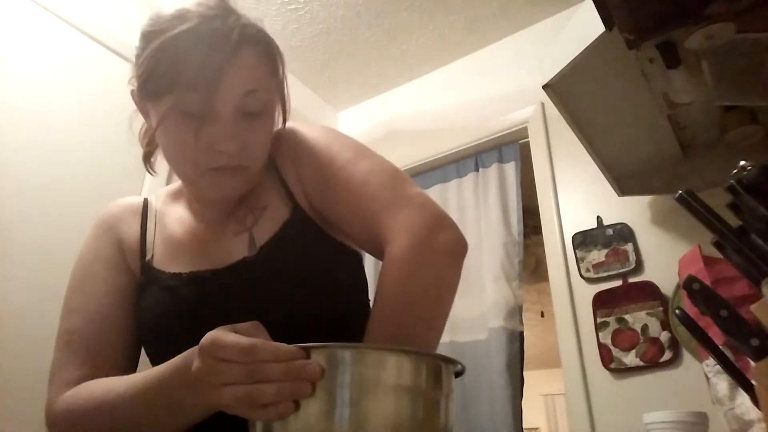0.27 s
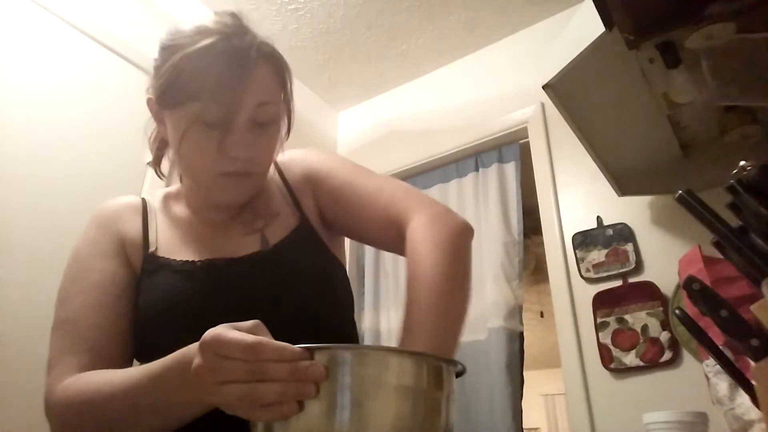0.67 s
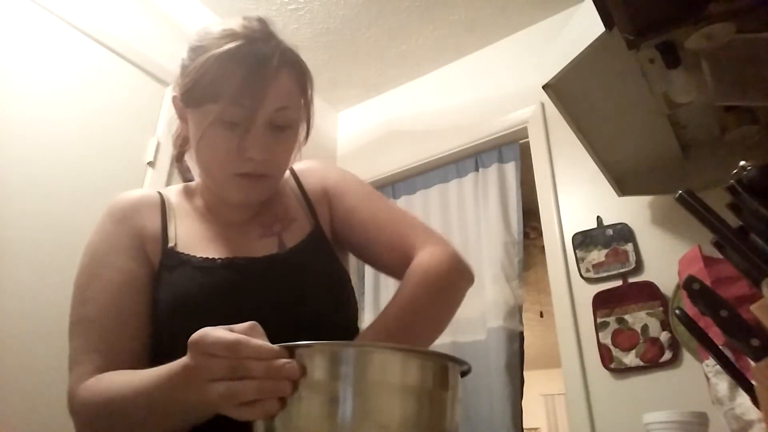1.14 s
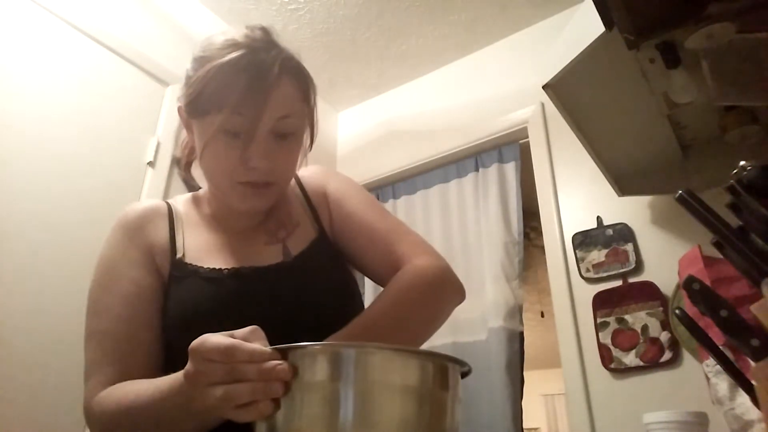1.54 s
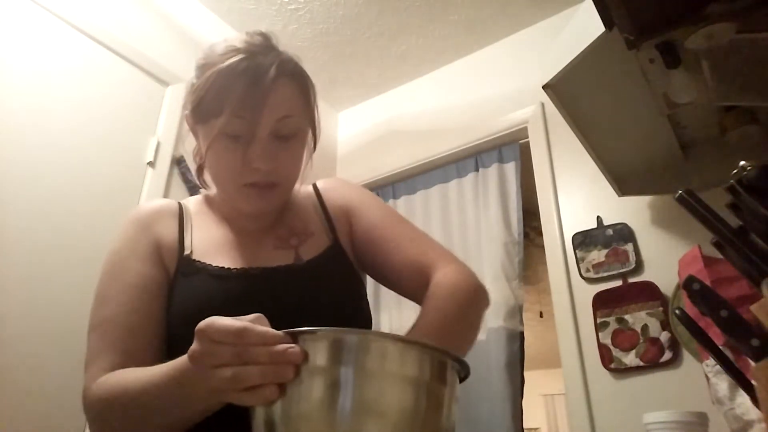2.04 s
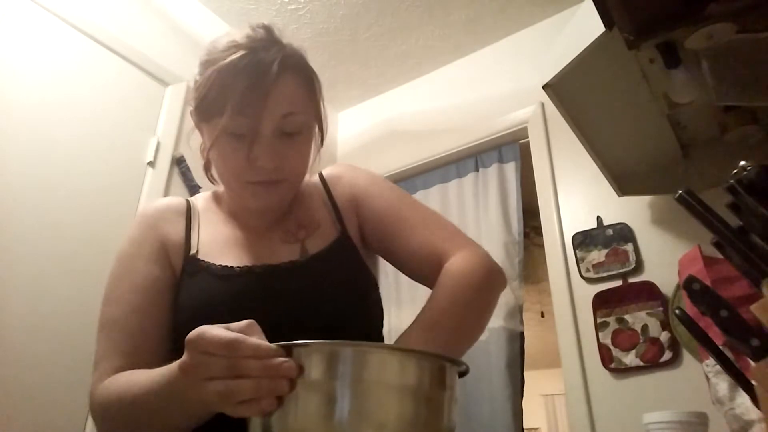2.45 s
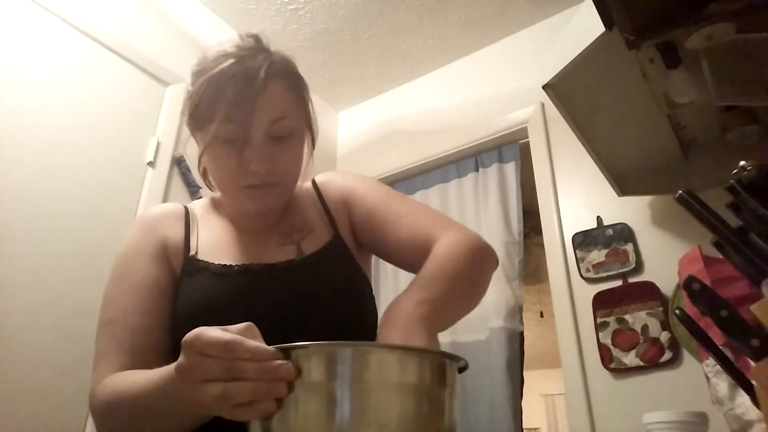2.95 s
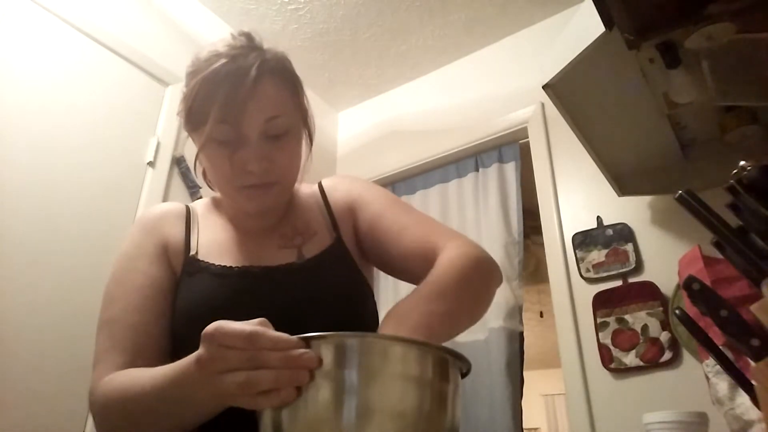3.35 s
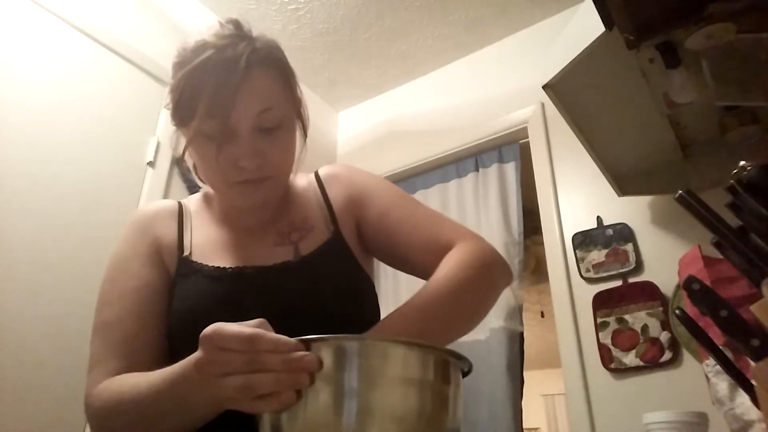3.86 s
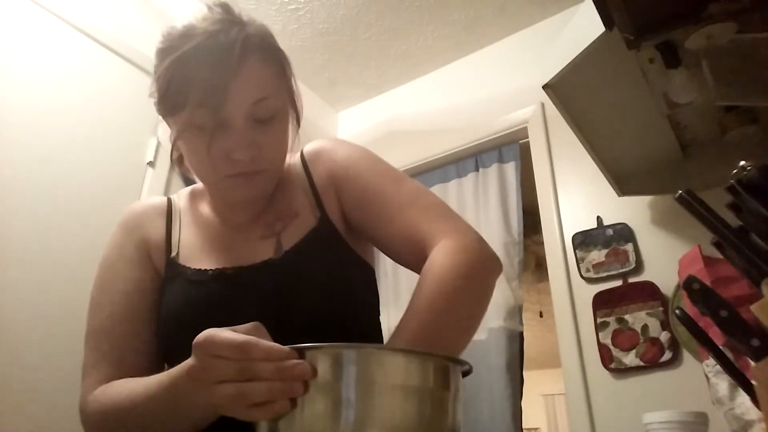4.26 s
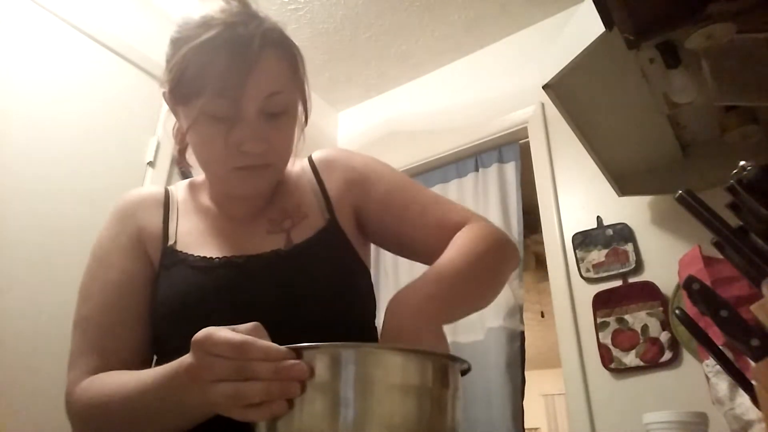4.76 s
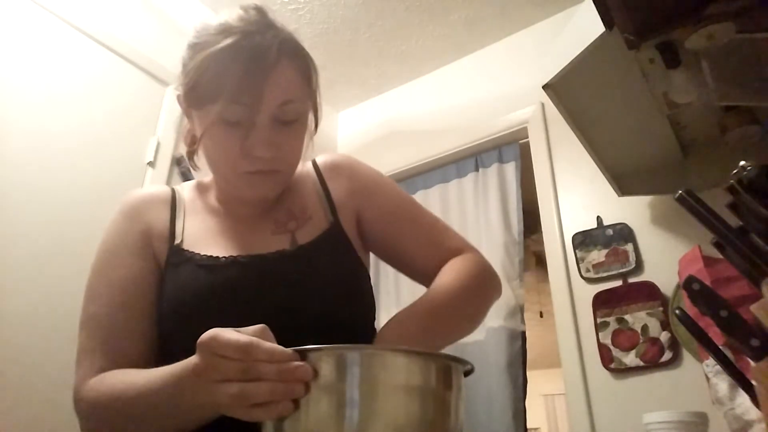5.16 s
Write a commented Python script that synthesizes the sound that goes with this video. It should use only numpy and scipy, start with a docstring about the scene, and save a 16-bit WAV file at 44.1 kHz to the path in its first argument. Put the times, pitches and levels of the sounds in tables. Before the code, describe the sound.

Close kneading in a metal bowl: sharp knock, dull push, bright double clang, then quiet rubbing and a few later thumps.

```python
"""A small, quiet kitchen: hands knead dough in a steel bowl on the counter, close to the microphone.
Pushes excite the counter's low modes; the bowl's base knocks, and once its bare wall clangs and rebounds.
Rubbing, wet squelches and hissing wipes are shaped noise; taps and slips make the rim ring faintly.
Faint air noise and an appliance's hum lie beneath; a noise suppressor hushes the pauses."""
import sys
import numpy as np
from scipy import signal
from scipy.fft import rfft, irfft
from scipy.io import wavfile
from scipy.ndimage import uniform_filter1d, minimum_filter1d

SR = 44100
rng = np.random.default_rng(int(sys.argv[2]) if len(sys.argv) > 2 else 0)


def unload_wav(signal):
    """Save mono or channel-first audio to the path in sys.argv[1] as 16-bit WAV at rate SR, clipped to [-1, 1]."""
    wavfile.write(
        sys.argv[1],
        SR,
        np.round(np.clip(np.atleast_2d(signal).T, -1, 1) * 32767).astype(np.int16),
    )


N = 238592
RING = np.arange(28000) / SR  # time axis of a single sound, s


def thud(db, corner_hz, damping_t60):
    """Modal excitation: a push through soft dough sets the counter booming; the hand's weight damps it."""
    # modes of the counter: f/Hz, relative level/dB, t60/s before the hand's damping
    counter = [(76.5, -6, 0.29), (93.9, 3.5, 0.096), (116.3, -3.5, 0.31), (177.4, -2.5, 0.19),
               (211, 0, 0.14), (240.7, 1.5, .045), (331, -5, 0.14)]
    onset = 1 - np.exp(-RING / 0.002)
    boom = soften(ring(counter, spread_hz=900) * onset, corner_hz, fall_db=23.0)
    boom = boom * 1000 ** (-RING / damping_t60)
    boom = highpass(boom, 66, order=6)
    return amp(db) * unit_blow(in_room(boom, wet_db=-12.0))


def knock(db, corner_hz, fall_db):
    """Impact: the base cracks down and rings briefly; a near wall and the room return duller clatter."""
    # dense clatter of bowl and counter: f/Hz, relative spectral level/dB
    clatter_spectrum = [(60, -30), (170, -9), (300, -2), (450, -1.5), (600, 1.5), (830, 0), (1050, -9.5),
                        (2100, -12.5), (2900, -18), (5500, -20), (8000, -31), (10500, -32), (16000, -27.5)]
    # modes of the bowl's base, damped by the dough: f/Hz, level/dB (each row gains 0.75 dB on the last), t60/s
    base_modes = [(207, -6.5, 0.078), (337, 4, 0.04), (401.7, -11, .15), (514, 0.5, 0.085),
                  (597, -4.5, 0.35), (687, -7, 0.34), (834, 2.5, 0.052), (1313, -7.5, 0.069),
                  (1900, -14, 0.034), (2094, -12, 0.078)]
    crack = contact(chatter_s=0.0035, chatter_db=5.5)
    near_wall = np.roll(crack, round(0.015 * SR), axis=1)
    echoes = amp(-8) * near_wall + amp(-2.0) * tail(build_s=0.0017)
    dull_echoes = soften(echoes, corner_hz=2420, fall_db=5.0)
    clatter = colour(amp(-0.5) * crack + dull_echoes, lambda hz: read(clatter_spectrum, hz))
    # alternating signs; the factor 1.09 gives the extra gain from row to row
    base = highpass(ring(base_modes, spread_hz=4600, polarity=-1.09), 220)
    blow = unit_blow(clatter) + amp(-3.0) * base
    return amp(db) * unit_blow(soften(blow, corner_hz, fall_db))


def clang(db):
    """Shell vibration: thin steel chatters against the counter and rings, damped by the hand on the rim."""
    # modes of the steel wall: f/Hz, relative level/dB, t60/s
    wall_modes = [(301, -17, .3), (495, -21, .4), (571, -16, .38), (684, -10, .24), (858, -7, .25),
                  (895, 5, .11), (1138, -10, .15), (1352, -5, .13), (1610, -19, .28), (1668, -17, .33),
                  (1686, -19, .37), (1696, 0, .11), (1727, -10, .29), (2208, -16, .2), (2304, -13, .15),
                  (2620, -21, .14), (3283, -19, .19), (3320, -20, .17), (3556, -21, .12)]
    # dense clash of the wall's many other modes: f/Hz, relative spectral level/dB
    clash_spectrum = [(140, -18), (240, -11), (340, -0.5), (600, 3), (870, 6), (1020, -3), (1400, -.5),
                      (1690, 4.5), (1920, -8), (2250, -2), (2950, -25.5), (3330, -16.5), (3900, -24.5),
                      (5400, -39.5), (16000, -55.5)]
    impact = contact(chatter_s=0.013, chatter_db=14) + amp(-9) * tail(build_s=0.0015)
    clash = colour(impact, lambda hz: read(clash_spectrum, hz))
    wall = in_room(ring(wall_modes, spread_hz=800, polarity=-1), wet_db=-10)
    return amp(db) * unit_blow(unit_blow(clash) + amp(-3) * unit_blow(wall))


def squelch(db, rise_s, hz, octaves):
    """Band-limited bursts: a swell of tiny wet snaps, coloured by the air pocket that they open into."""
    swell = RING * np.exp(-RING / rise_s)
    snaps = diffuse(len(RING)) * rng.exponential(1, len(RING)) ** 2 * swell

    def pocket_db(f):
        # 3 dB down at the edges of a band so many octaves wide
        return -10 * np.log10(1 + (2 * np.log2((f + 1) / hz) / octaves) ** 4)

    wet = colour(snaps, pocket_db)
    return amp(db) * unit_blow(in_room(wet, wet_db=-7))


def wipe(length, db, tilt_db):
    """Sliding friction: skin on steel gives a fine hiss, brighter in some strokes than in others."""
    # colour of the hiss before the tilt: f/Hz, relative spectral level/dB
    hiss_colour = [(300, -11.5), (1600, -4), (2600, 0), (4500, -7), (6500, -3), (8300, -3.5), (10500, 0),
                   (13000, -4), (16000, 2)]
    pivot_hz = 6000  # the tilt, in dB per octave, leaves this frequency alone
    spectrum = [(hz, level + tilt_db * np.log2(hz / pivot_hz)) for hz, level in hiss_colour]
    hiss = diffuse(len(RING), spectrum) * grainy(len(RING), depth_db=0.5, size=300)
    return amp(db) * stroke(RING, length, rise_s=0.038, fade_s=0.04) * hiss


def tick(db, rise_s):
    """Stick-slip excitation: a fingertip grips and slips on the rim, whose modes ring faintly."""
    # modes of the rim: f/Hz, relative level/dB, t60/s
    rim = [(1718, -17.5, 0.025), (3305, -16.5, 0.019), (3358, 10, 0.054), (3468, 4.5, 0.039),
           (5292, -2, .03), (5310, -4, 0.035)]
    slips = rng.standard_normal(len(RING)) * RING * np.exp(-RING / rise_s)
    ping = signal.fftconvolve(ring(rim, spread_hz=1000), slips[None], axes=1)[:, :len(RING)]
    ping = highpass(ping, 1400)
    return amp(db) * unit_blow(in_room(ping, wet_db=-9.5))


def rubbing():
    """Friction noise: dough and fingers drag along the wall, their motion shaping its level."""
    # strokes round the bowl: start t/s, length/s, level/dB before a common gain of 3 dB
    rubs = [(0.829, .07, -61.5), (0.923, 0.092, -62), (1.276, .12, -60.5), (1.88, 0.066, -62.5),
            (3.043, 0.15, -68), (3.36, 0.4, -82), (4.586, 0.29, -75)]
    # colour of the rubbing: f/Hz, relative spectral level/dB
    rub_colour = [(60, -19.5), (150, -3), (320, 1.5), (430, -5), (560, 3.5), (850, 0.5), (1150, -17),
                  (1650, -23.5), (2500, -19), (4200, -23.5), (7000, -15.5), (9000, -34.5), (16000, -52.5)]
    t = np.arange(N) / SR
    level = sum(amp(db) * stroke(t - s, length, rise_s=0.043, fade_s=0.16) for s, length, db in rubs)
    return amp(3.0) * level * diffuse(N, rub_colour) * grainy(N, depth_db=1.5, size=400)


def still_room():
    """Stationary background: faint diffuse air noise and an appliance's steady sinusoidal hum."""
    # spectrum of the air noise: f/Hz, relative spectral level/dB
    air_spectrum = [(15, -33.5), (25, -24), (37, -24.5), (64, -7.5), (123, -9), (148, -21), (307, -8),
                    (403, -15.5), (557, -5), (620, -10.5), (905, -9), (1280, -13), (2500, -16.5),
                    (8000, -22), (10500, -29), (15800, -23.5)]
    air = amp(-66.5) * diffuse(N, air_spectrum)
    hum = amp(-80) * unit(np.sin(2 * np.pi * 119.5 * np.arange(N) / SR))
    return air + hum


def contact(chatter_s, chatter_db):
    """Impulsive contact: one sharp pulse, then a brief chatter as the surfaces settle."""
    pulse = unit_blow(signal.unit_impulse(len(RING)))
    chatter = unit_blow(diffuse(len(RING)) * np.exp(-RING / chatter_s))
    return unit_blow(pulse + amp(chatter_db) * chatter)


def ring(modes, spread_hz, polarity=1):
    """Modal superposition: decaying sines, whose phase differs more between the channels the higher they lie."""
    out = np.zeros((2, len(RING)))
    for k, (hz, db, t60) in enumerate(modes):
        skew = np.array([[1], [-1]]) * (-1) ** k * np.pi / 4 * np.tanh(hz / spread_hz)
        decay = 1000 ** (-RING / t60)
        out += polarity ** k * amp(db) * decay * np.sin(2 * np.pi * hz * RING + skew)
    attack = np.minimum(RING * 3000, 1)
    return unit_blow(out * attack)


def soften(x, corner_hz, fall_db):
    """Contact time: a soft blow lasts longer, so above its corner it falls by fall_db per octave."""
    return colour(x, lambda hz: -fall_db / 4 * np.log2(1 + (hz / corner_hz) ** 4))


def stroke(t, length, rise_s, fade_s):
    """Motion envelope: a hand sets off at t = 0, gathers speed, holds it and dies away."""
    rise = np.sin(np.pi / 2 * np.clip(t / rise_s, 0, 1)) ** 2
    return rise * np.exp(-np.maximum(t - length, 0) / fade_s)


def grainy(n, depth_db, size):
    """Stick-slip modulation: the uneven gain of a rubbed surface."""
    return unit(amp(depth_db * unit(uniform_filter1d(rng.standard_normal(n), size))))


def tail(build_s):
    """Reverberation: dense reflections build up, then each band decays at its own rate."""
    # reverberation of the kitchen: f/Hz, t60/s
    kitchen = [(100, 0.43), (300, 0.3), (700, .34), (2000, 0.29), (5000, 0.28), (12000, 0.25)]
    hz, t, z = signal.stft(diffuse(len(RING)), SR, nperseg=256)
    decay = 1000 ** (-t / read(kitchen, hz)[:, None])
    fading = signal.istft(z * decay, SR, nperseg=256)[1]
    return unit_blow(fading[:, :len(RING)] * (1 - np.exp(-RING / build_s)))


def in_room(x, wet_db):
    """Convolution with a room response: direct sound plus the kitchen's reflections."""
    response = tail(build_s=0.0086) / np.sqrt(SR / 20)  # unit energy
    echo = signal.fftconvolve(x, response, axes=1)[:, :x.shape[-1]]
    return x + amp(wet_db) * echo


def diffuse(n, spectrum=None):
    """Diffuse-field coherence: stereo noise, alike in the bass and nearly unrelated in the treble."""
    # likeness of the two channels: f/Hz, correlation (0-1)
    likeness = [(60, 0.99), (200, 1), (600, 0.62), (1200, 0.01), (3000, .05), (16000, .05)]
    hz = np.fft.rfftfreq(n, 1 / SR)
    mid, side = rfft(rng.standard_normal((2, n)))
    same = np.clip(read(likeness, hz), 0, 1)
    z = mid * np.sqrt(1 + same) + np.array([[1], [-1]]) * side * np.sqrt(1 - same)
    gain = amp(read(spectrum, hz)) if spectrum else 1
    return unit(irfft(z * gain, n))


def colour(x, db_at, size=65536):
    """Minimum-phase filtering: a causal response whose gain is db_at(Hz)."""
    log_gain = np.log(amp(np.maximum(db_at(abs(np.fft.fftfreq(size, 1 / SR))), -100)))
    # the Hilbert transform of the log gain gives the phase
    response = np.exp(np.conj(signal.hilbert(log_gain)))[:size // 2 + 1]
    return irfft(rfft(x, size) * response)[..., :x.shape[-1]]


def highpass(x, corner_hz, order=2):
    """Butterworth filtering: removes what lies below the corner."""
    return signal.sosfilt(signal.butter(order, corner_hz, "high", fs=SR, output="sos"), x)


def amp(db):
    """Level definition: decibels to amplitude gain."""
    return 10 ** (np.asarray(db) / 20)


def read(points, hz):
    """Interpolation on a logarithmic frequency axis."""
    f, value = np.transpose(points)
    return np.interp(np.log(hz + 1), np.log(f + 1), value)


def unit(x):
    """Power normalisation: scales to rms 1."""
    return x / np.sqrt(np.mean(x ** 2) + 1e-20)


def unit_blow(x):
    """Energy normalisation: a blow gets the energy of 50 ms at rms 1."""
    return unit(x) * np.sqrt(SR / 20 / x.shape[-1])


def add(mix, s, sound):
    """Superposition: adds a stereo sound at time s."""
    part = mix[:, max(round(s * SR), 0):][:, :sound.shape[-1]]
    part += sound[..., :part.shape[-1]]


def scene():
    """Superposition of all blows and wipes over the rubbing and the quiet kitchen."""
    # pushes into the counter: t/s, level/dB, hardness as corner f/Hz, t60/s of the hand's damping
    thuds = [(0.085, -52.5, 91, 0.38), (0.132, -46, 106, 2.4), (0.347, -22.5, 230, 0.4),
             (0.617, -58, 90, 0.13), (0.868, -37, 56, 0.37), (1.205, -22, 143, 1.06),
             (1.624, -41, 75, 0.31), (2.254, -57, 131, 0.73), (2.49, -64, 108.5, 0.35),
             (2.785, -65, 80, 0.46), (3.103, -63, 119, 0.39), (3.836, -32, 87, 0.68),
             (4.308, -45, 137.6, 0.35), (4.411, -30, 300, 0.5), (4.859, -49, 109.9, .3),
             (4.904, -25, 326, 4)]
    # the bowl lands on the counter: t/s, level/dB, hardness as corner f/Hz, fall above it/(dB per octave)
    knocks = [(0.347, -15.5, 2700, 12), (2.258, -91, 923, 7), (4.411, -40, 1268, 10),
              (4.799, -58.5, 2300, 7.5), (4.9054, -18.5, 1330, 23.5)]
    # the bare wall is struck and rebounds: t/s, level/dB
    clangs = [(1.6222, -7), (1.6446, -11)]
    # fingers tap or slide on the rim: t/s, level/dB, rise/s
    ticks = [(2.152, -68, .009), (2.205, -66.5, .025), (2.403, -65.5, 0.0094), (4.801, -58.5, .001),
             (4.915, -60.5, .028), (5.029, -63, .04), (5.289, -71.5, 0.0051)]
    # dough squashes and air pops out: t/s, level/dB, rise/s, centre f/Hz, width/octaves
    squelches = [(0.581, -52, 0.0035, 1720, 0.6), (1.207, -36, 0.012, 230, 0.52),
                 (1.224, -43.5, 0.012, 740, 0.59), (1.59, -61, 0.0027, 1099, 0.83),
                 (2.221, -64.5, 0.007, 550, 0.26), (2.255, -61.5, 0.0059, 604.5, 0.38),
                 (3.08, -68.5, .014, 894, 1.4), (3.216, -64.5, 0.0083, 667.5, 0.56),
                 (3.845, -60, 0.018, 935, 0.14), (3.841, -56.5, 0.024, 333, 0.79),
                 (4.41, -39.5, 0.0013, 262, 0.88), (4.43, -54.5, 0.025, 655, 1),
                 (4.41, -61.5, 0.03, 3320, 0.95)]
    # the hand wipes over the steel: start t/s, length/s, level/dB, brightness/(dB per octave)
    wipes = [(0.073, 0.14, -64.5, -5), (.27, 0.055, -61.5, -4.5), (0.453, 0.16, -61, -8),
             (.74, 0.047, -61, 1.5), (0.864, 0.19, -62, -0.5), (1.05, 0.23, -62.5, -2.5),
             (1.178, 0.2, -60.5, -6), (1.347, 0.088, -53, -.5), (1.44, .13, -63, 2.5),
             (1.88, 0.14, -69, 4.5), (2.13, .04, -58, 7.5), (2.222, .06, -63.5, 7), (2.38, 0.056, -64, 2.5),
             (2.84, .07, -68, 8), (3.019, 0.1, -52.5, 2), (3.22, .07, -64.5, 0), (3.372, 0.17, -76.5, -5),
             (3.699, .1, -71, 1.5), (3.82, 0.049, -64.5, 5), (4.573, 0.28, -72, -7.5),
             (4.898, 0.26, -54.5, -0.5), (5.22, 0.16, -73, 4)]
    mix = still_room() + rubbing()
    events = ((thud, thuds), (knock, knocks), (clang, clangs),
              (tick, ticks), (squelch, squelches), (wipe, wipes))
    for source, rows in events:
        for s, *row in rows:
            add(mix, s, source(*row))
    return mix


def suppress(x):
    """Downward expansion: a noise suppressor turns down all but the bass when the midrange is quiet."""
    threshold_db, knee_db, depth_db, lowest_hz = -63.5, 9, 13.5, 202
    middle = signal.sosfilt(signal.butter(2, [400, 3500], "band", fs=SR, output="sos"), x)
    power = uniform_filter1d((middle ** 2).mean(0), size=600)
    level_db = 10 * np.log10(abs(power) + 1e-12)
    shut = 0.5 - 0.5 * np.tanh((level_db - threshold_db) / knee_db)  # 0 open, 1 shut
    bass = signal.sosfiltfilt(signal.butter(2, lowest_hz, fs=SR, output="sos"), x)
    return bass + (x - bass) * amp(-depth_db * shut)


def limit(x, ceiling):
    """Peak limiting: a gain that dips around each peak holds it at the ceiling."""
    gain = np.minimum(1, ceiling / (abs(x) + 1e-9))
    gain = uniform_filter1d(minimum_filter1d(gain, size=101), size=101)
    return x * gain


def record(dry):
    """Transmission chain: right port's treble resonance, noise suppressor, fast limiter, band limit."""
    port_hz, port_width_hz, port_db = 10450, 1250, 15

    def port_gain_db(hz):
        return port_db / (1 + ((hz - port_hz) / port_width_hz) ** 2 / 2) ** 2

    right = colour(dry[1], port_gain_db, size=262144)
    heard = limit(suppress(np.array([dry[0], right])), ceiling=0.87)
    band_limit = signal.firwin(511, 15800, window=("kaiser", 9), fs=SR)
    return signal.oaconvolve(heard, band_limit[None], "same")


dry = scene()
out = record(dry)
unload_wav(out)
```